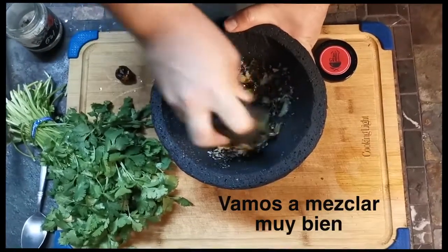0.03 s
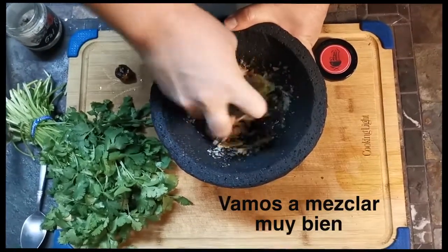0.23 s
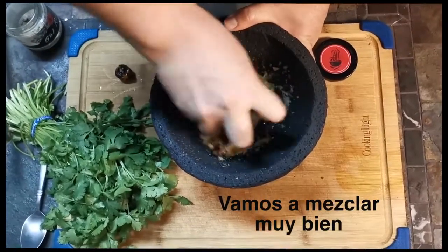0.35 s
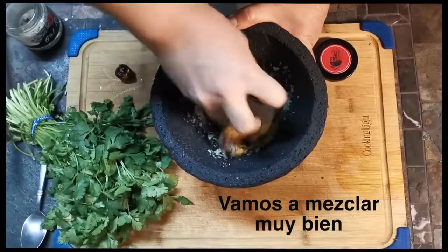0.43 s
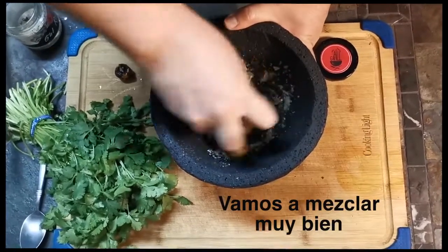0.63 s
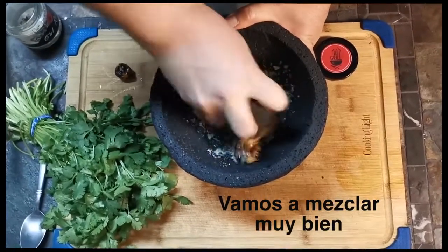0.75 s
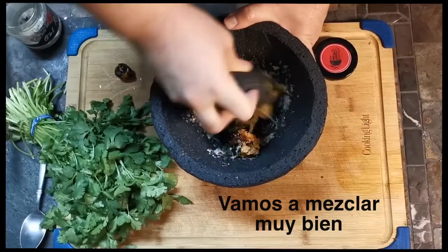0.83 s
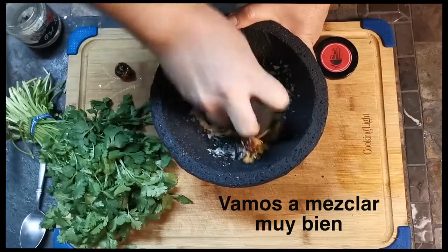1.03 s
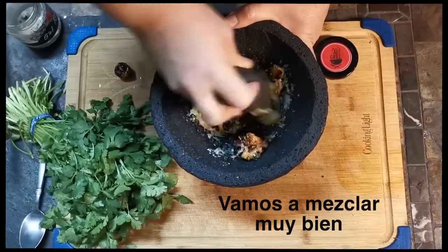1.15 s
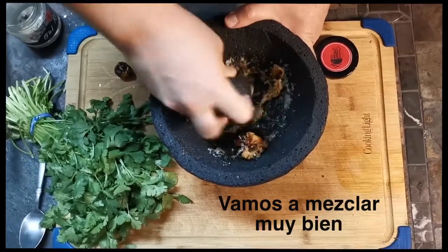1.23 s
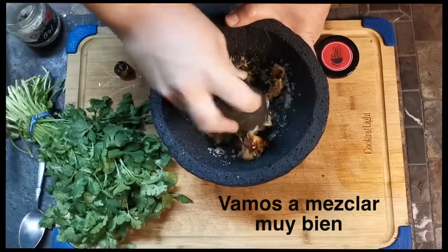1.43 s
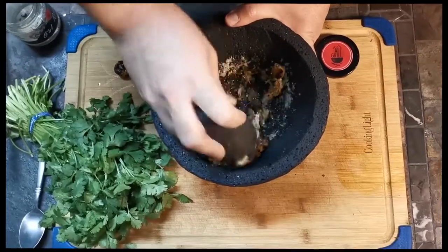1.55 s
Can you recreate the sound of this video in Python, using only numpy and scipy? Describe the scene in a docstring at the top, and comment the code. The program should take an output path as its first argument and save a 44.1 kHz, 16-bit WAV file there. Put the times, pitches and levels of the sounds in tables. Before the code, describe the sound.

A stone pestle grinds gritty, moist food in a stone mortar on a wooden board, quick dull knocks and short rough scrapes with fine crackle, easing off at the end; close microphone in a small kitchen.

```python
"""A diffuse wash dies away at the start, then a stone pestle grinds moist, gritty food in a stone mortar.
The mortar stands on a wooden board in a kitchen. Knocks (impulses), stick-slip scrapes and drag (random
clicks) ring the same few damped modes of the bowl; the board adds decaying sines to the knocks.
Grains crackle under the pestle as coloured random clicks, with larger cracks and fading rasps as well.
The room adds a short tail of decaying noise, over quiet coloured noise for the air."""
import sys
import numpy as np
from scipy import signal
from scipy.fft import rfft, irfft
from scipy.io import wavfile
from scipy.ndimage import uniform_filter1d

SR = 44100
rng = np.random.default_rng(int(sys.argv[2]) if len(sys.argv) > 2 else 0)


def store_pcm(level_fs):
    """Save levels as 16-bit WAV."""
    pcm = np.round(np.clip(level_fs, -1, 1) * 32767).astype(np.int16)
    wavfile.write(sys.argv[1], SR, np.atleast_2d(pcm).T)


N = 70560  # samples, 1.6 s
TIME = np.arange(N) / SR


# Pestle blows on the bowl: t/s, peak level of the ring/dB, contact brightness f/Hz (low where food cushions)
KNOCKS = [(.151, -29, 706), (.2098, -13, 886), (.241, -15.5, 637), (.2475, -7, 597), (.3255, -12, 873),
          (.393, -10.5, 834), (.464, -7.5, 835), (.4882, -9, 900), (.5187, -12.5, 944), (.5478, -6.5, 995),
          (.5575, -6, 1000), (.568, -5.5, 1065), (.6256, -6, 1574), (.688, -6, 1000), (.6982, -1.5, 1294),
          (.7105, -6, 680), (.8522, -18.5, 847), (.8765, -13, 1100), (0.9187, -9, 813), (.955, -28.5, 1300),
          (.9585, -3.5, 1650), (1.0005, -9.5, 880), (1.0308, -7.5, 1500), (1.0338, -11.5, 800),
          (1.0935, -12, 900), (1.2207, -15.5, 1000), (1.2445, -21, 1100), (1.266, -3.5, 1200)]
# Modes of the wooden board under the mortar: f/Hz, level/dB re a knock of 1 kHz brightness, t60/s
BOARD_MODES = [(243, -47.5, 0.17), (286.3, -38, 0.13)]
BOARD_DB_PER_OCTAVE = 13.5  # harder contacts reach the board better


def knocks():
    """Impulse response: each blow rings the bowl's modes and thumps the board's lower ones."""
    out = np.zeros(N)
    t = TIME[:SR // 4]
    thump = sum(from_db(db) * np.sin(2 * np.pi * hz * t) * dying(t, t60) for hz, db, t60 in BOARD_MODES)
    thump = thump * pressure(t, t[-1])
    for start, db, contact_hz in KNOCKS:
        ring = bowl(signal.unit_impulse(len(t)), contact_hz)
        octaves = np.log2(contact_hz / 1000)
        board_gain = from_db(BOARD_DB_PER_OCTAVE * octaves)
        add(out, start, from_db(db) * (ring / np.abs(ring).max() + board_gain * thump))
    return out


# Catches of the pestle: start t/s, length/s, rms level/dB, contact brightness f/Hz
SCRAPES = [(0.23, 0.052, -22, 728), (0.309, 0.061, -24, 832), (0.375, 0.031, -26.5, 1000),
           (0.415, 0.093, -26.5, 806), (.533, .064, -23, 980), (0.682, .06, -17.5, 885),
           (0.762, 0.03, -25, 1000), (0.846, .039, -22, 920), (0.909, 0.018, -16.5, 1008),
           (1.011, .017, -21, 1316), (1.032, 0.043, -20, 1000), (1.1, .033, -24, 1010),
           (1.171, 0.042, -22, 1070), (1.251, 0.013, -19, 1000), (1.282, 0.027, -24.5, 710)]


def scrapes():
    """Stick-slip friction: the pestle catches and scrapes in short runs of slips."""
    out = np.zeros(N)
    t = TIME[:SR // 4]
    for start, length, db, contact_hz in SCRAPES:
        add(out, start, from_db(db) * pressure(t, length) * rubbing(contact_hz, len(t)))
    return out


# Steady drag between the catches: t/s, rms level/dB
DRAG = [(0, -54.5), (.1, -46.5), (.19, -39), (.26, -31.5), (.42, -28.5), (.505, -46), (.58, -34),
        (.615, -60), (.67, -28), (.75, -29.5), (.82, -34.5), (.92, -36.5), (.98, -43.5), (1.08, -30),
        (1.145, -35), (1.3, -35), (1.35, -44), (1.42, -65), (1.6, -98)]
# Thin singing of the bowl's highest mode under friction: t/s, rms level/dB
SING = [(0, -54.5), (.1, -71), (.33, -73), (.365, -54.5), (.395, -44), (.42, -58), (.48, -57.5), (.6, -64),
        (.9, -74), (1.25, -68.5), (1.4, -70.5), (1.6, -101)]
DRAG_HZ = 730  # contact brightness


def drag():
    """Roughness excitation: rubbing over rough stone gives a dull rumble and a thin high ring."""
    hz, _, t60 = BOWL_MODES[-1]
    t = TIME[:SR // 10]
    high_mode = np.sin(2 * np.pi * hz * t) * dying(t, t60)
    sing = signal.fftconvolve(clicks(GRAINS_PER_S, GRAIN_SPREAD_DB, N), high_mode)[:N]
    return curve(DRAG) * rubbing(DRAG_HZ, N) + curve(SING) * evened(sing)


SLIPS_PER_S, SLIP_SPREAD_DB = 870, 4


def rubbing(contact_hz, size):
    """Random slip excitation: irregular slips ring the bowl at a held level."""
    return evened(bowl(clicks(SLIPS_PER_S, SLIP_SPREAD_DB, size), contact_hz))


# Modes of the mortar and pestle, before scatter and filtering: f/Hz, level/dB, t60/s
BOWL_MODES = [(566.4, 3.5, 0.039), (649.4, -1, 0.0096), (728, -7.5, 0.0047), (929, -2.5, 0.029),
              (1176, -19, 0.027), (1440, -23.5, 0.017), (2328, -14, 0.029)]
MODE_SCATTER_DB, MODE_SHIFT = 2.7, 0.019  # spot to spot: spread of level, fractional spread of frequency
MODE_RISE_S = 0.00055  # the ring builds up as the contact closes
BOWL_LOW_CUT_HZ = 607


def bowl(force, contact_hz):
    """Modal superposition: a force, dulled by the contact, rings modes that vary from spot to spot."""
    ring = 0
    t = TIME[:SR // 10]
    for k, (hz, db, t60) in enumerate(BOWL_MODES):
        hz = hz * (1 + MODE_SHIFT * rng.standard_normal())
        gain = (-1) ** k * from_db(db + MODE_SCATTER_DB * rng.standard_normal())
        ring = ring + gain * np.cos(2 * np.pi * hz * t) * dying(t, t60)
    ring = ring * (1 - np.exp(-(t / MODE_RISE_S) ** 2))
    ring = cut(ring, BOWL_LOW_CUT_HZ, "high", order=4)
    ring = cut(ring, contact_hz, "low", order=4)
    return signal.fftconvolve(force, ring)[:len(force)]


# Dry grit on the stone after hard contacts: start t/s, t60/s, starting rms level/dB, low edge f/Hz
RASPS = [(0.626, 0.34, -49.5, 1436), (.69, 0.27, -40, 1440), (0.96, 0.38, -41, 1000),
         (1.031, 0.34, -41, 1088), (1.271, 0.5, -51.5, 974)]
# Spectrum of the rasps: f/Hz, relative level/dB
RASP_COLOUR = [(900, -12.5), (1400, 12), (1850, -9.5), (2100, -3), (2330, -3.5), (2700, -3), (4000, -18),
               (9000, -56)]


def rasps():
    """Granular friction: dense clicks of dry grit, coloured and fading exponentially."""
    out = np.zeros(N)
    t = TIME[:SR // 4]
    for start, t60, db, edge_hz in RASPS:
        rasp = colour(clicks(GRAINS_PER_S, GRAIN_SPREAD_DB, len(t)), RASP_COLOUR)
        rasp = cut(rasp, edge_hz, "high", order=4)
        add(out, start, from_db(db) * pressure(t, t[-1]) * dying(t, t60) * rms_one(rasp))
    return out


# Fine grit being crushed, stroke by stroke: t/s, level/dB before GRIT_DB
GRIT = [(0, -54.5), (.1, -54.5), (.2, -50), (.31, -47.5), (.365, -47), (.38, -51.5), (.43, -59), (.46, -40),
        (.51, -58), (.57, -49.5), (.62, -55), (.655, -59.5), (.695, -43.5), (.735, -61), (.78, -54),
        (.91, -48.5), (.98, -61.5), (1.01, -56), (1.1, -60), (1.18, -62), (1.215, -54.5), (1.26, -65.5),
        (1.33, -61), (1.42, -77), (1.6, -74.5)]
# Single grains that crack: t/s, peak level/dB
CRACKS = [(0.2657, -40), (0.2909, -42), (.368, -27), (0.4485, -41), (.458, -44.5), (0.4814, -33),
          (0.5224, -35), (0.563, -34), (0.6978, -33.5), (0.855, -39), (0.956, -39), (1.007, -36.5),
          (1.0218, -38), (1.155, -44.5), (1.208, -40), (1.318, -43.5)]
GRIT_DB, CRACK_T60_S = -2, 0.012  # crack decay is that of the noise before colouring
GRIT_SPLIT_HZ, FINER_DB_PER_S = 6020, 1  # fine grains gain and coarse ones lose as the food is ground


def grit():
    """Granular fracture: a dense crackle of coarse and fine grains, with larger ones cracking."""
    finer = from_db(FINER_DB_PER_S * (TIME - TIME.mean()))
    coarse_grains = cut(crunch(), GRIT_SPLIT_HZ, "low", order=4) / finer
    fine_grains = cut(crunch(), GRIT_SPLIT_HZ, "high", order=4) * finer
    out = from_db(GRIT_DB) * curve(GRIT) * (coarse_grains + fine_grains)
    t = TIME[:SR // 20]
    for start, db in CRACKS:
        crack = colour(rng.standard_normal(len(t)) * dying(t, CRACK_T60_S), GRIT_COLOUR)
        add(out, start, from_db(db) * crack / np.abs(crack).max())
    return out


# Spectrum of breaking grains: f/Hz, relative level/dB
GRIT_COLOUR = [(1200, -13.5), (1900, -30.5), (2400, -3), (3500, 8), (4500, -2.5), (5700, 3.5),
               (7000, -10.5), (8300, -10), (9400, -35.5), (11000, -30.5), (15000, -46.5)]
GRAINS_PER_S, GRAIN_SPREAD_DB = 5400, 3.5
CRUNCH_SWING_DB, CRUNCH_PER_S = 4, 31  # rms swing of the clumps, and their low-pass corner in Hz


def crunch():
    """Clustered random impulses: grains break in clumps."""
    swing = rms_one(cut(rng.standard_normal(N), CRUNCH_PER_S, "low"))
    clumps = from_db(CRUNCH_SWING_DB * swing)
    return rms_one(colour(clumps * clicks(GRAINS_PER_S, GRAIN_SPREAD_DB, N), GRIT_COLOUR))


ROOM_T60_S, ROOM_DB, ROOM_DELAY_S, ROOM_CUT_HZ = 0.26, -15.5, 0.018, 4000


def kitchen(x):
    """Diffuse reverberation: dense, slightly dull reflections as exponentially decaying noise."""
    t = TIME[:SR // 2]
    tail = rng.standard_normal(len(t)) * dying(t, ROOM_T60_S) * (t > ROOM_DELAY_S)
    reflections = signal.fftconvolve(x, tail / np.linalg.norm(tail))[:N]
    return from_db(ROOM_DB) * cut(reflections, ROOM_CUT_HZ, "low")


# Spectrum of the kitchen air: f/Hz, relative level per Hz/dB
AIR = [(20, 7.5), (45, -1), (85, -10), (120, -6.5), (180, -13), (400, -6), (800, -8), (1600, -19),
       (3000, -32), (6000, -43.5), (9000, -51), (15000, -48.5)]
# Spectrum of the diffuse wash: f/Hz, relative level per Hz/dB
WASH = [(80, -20), (120, 6.5), (180, -7.5), (400, -10.5), (700, 12.5), (1500, -4), (2200, -3.5),
        (3200, -9.5), (7000, -18), (10000, -32.5)]
AIR_DB = -52  # rms
WASH_DB, WASH_T60_S = -41, 0.46  # starting rms, decay


def background():
    """Spectrally shaped noise: steady quiet room air, and a wash that fades from the start."""
    air = from_db(AIR_DB) * rms_one(colour(rng.standard_normal(N), AIR))
    wash = from_db(WASH_DB) * rms_one(colour(rng.standard_normal(N), WASH))
    return air + wash * dying(TIME, WASH_T60_S)


def clicks(per_s, spread_db, size):
    """Random impulse train: many small clicks and a few large, of either sign."""
    strength = from_db(spread_db * np.minimum(rng.exponential(1, size), 4))
    happens = rng.random(size) < per_s / SR
    return happens * strength * rng.choice([-1, 1], size)


def dying(t, t60):
    """Exponential damping: 60 dB down after t60."""
    return np.exp(-np.log(1000) * t / t60)


SCRAPE_EDGE_S = .006


def pressure(t, length):
    """Contact-force envelope: swell, hold and let go."""
    return np.clip(np.minimum(t, length - t) / SCRAPE_EDGE_S, 0, 1)


EVEN_S = 0.023  # averaging window


def evened(x):
    """Running-rms normalisation: hold the slow level at 1 and keep the fast lumps."""
    power = uniform_filter1d(x ** 2, max(int(EVEN_S * SR), 2))
    return x / np.sqrt(np.abs(power) + 1e-12)


def colour(x, spectrum):
    """Minimum-phase filtering: a causal filter through (f/Hz, level/dB) points, from the cepstrum."""
    size = 2 * len(x)
    hz, db = np.transpose(spectrum)
    bins_hz = np.fft.rfftfreq(size, 1 / SR)
    log_gain = np.log(from_db(np.interp(np.log(bins_hz + 1), np.log(hz), db)))
    cepstrum = irfft(log_gain)[:len(x)]
    cepstrum[1:] *= 2  # fold onto positive time, which makes it causal
    return irfft(rfft(x, size) * np.exp(rfft(cepstrum, size)))[:len(x)]


def cut(x, hz, kind, order=2):
    """Butterworth filtering: a maximally flat low- or high-pass."""
    corner_hz = np.clip(hz, 10, .45 * SR)
    return signal.sosfilt(signal.butter(order, corner_hz, kind, fs=SR, output="sos"), x + 1e-18)


def curve(rows):
    """Level envelope: gain over time, linear in dB between (t/s, level/dB) rows."""
    return from_db(np.interp(TIME, *np.transpose(rows)))


def from_db(db):
    """Level to amplitude: decibels to gain."""
    return 10 ** (np.asarray(db) / 20)


def rms_one(x):
    """Power normalisation: scale to unit rms."""
    return x / np.sqrt(np.mean(x ** 2) + 1e-20)


def add(out, start_s, sound):
    """Linear superposition: mix a sound in at a time."""
    start = int(max(start_s, 0) * SR)
    out[start:start + len(sound)] += sound[:N - start]


def scene():
    """Direct plus reverberant field: the mortar on its board, in the room."""
    mortar = knocks() + scrapes() + drag() + rasps() + grit()
    return (mortar + kitchen(mortar) + background())[None]


CUTOFF_HZ = 15700  # stopband edge, 70 dB down


def record(dry):
    """Band limiting: a steep Chebyshev low-pass cuts the top."""
    return signal.sosfilt(signal.cheby2(12, 70, CUTOFF_HZ, fs=SR, output="sos"), dry)


dry = scene()
out = record(dry)
store_pcm(out)
```